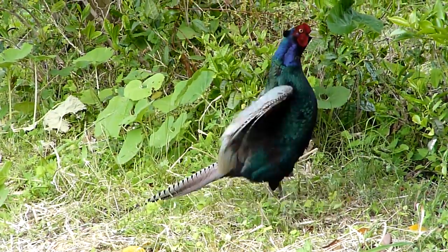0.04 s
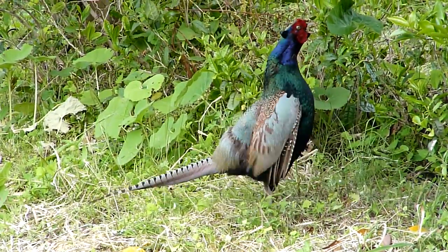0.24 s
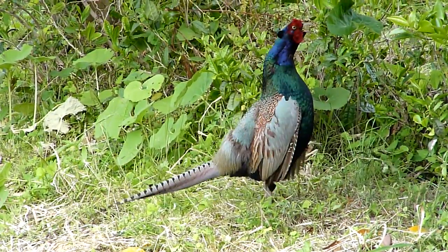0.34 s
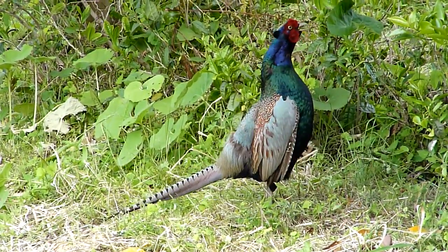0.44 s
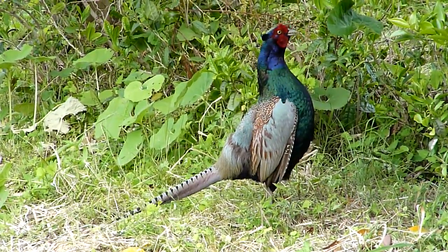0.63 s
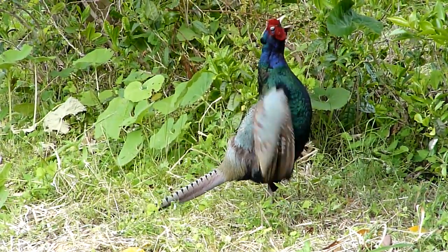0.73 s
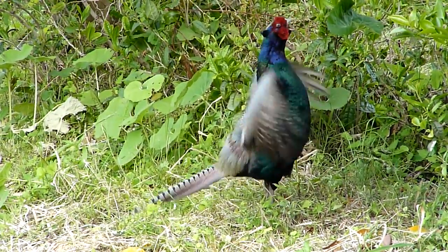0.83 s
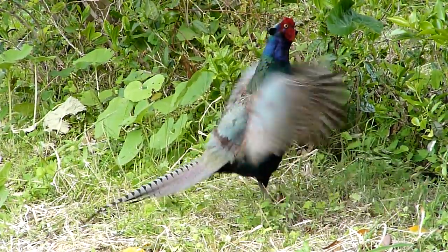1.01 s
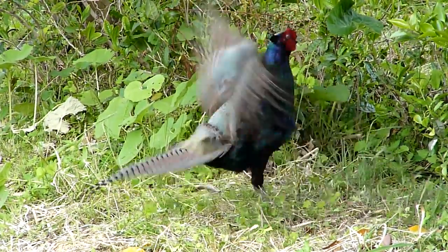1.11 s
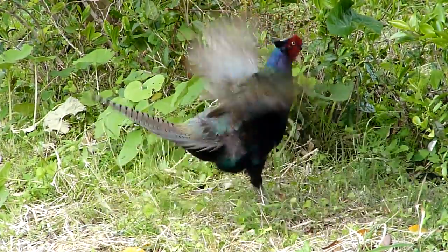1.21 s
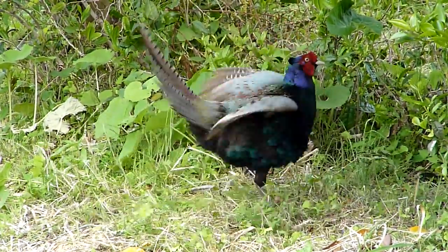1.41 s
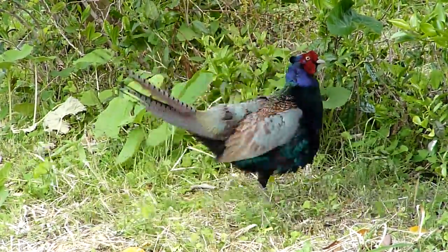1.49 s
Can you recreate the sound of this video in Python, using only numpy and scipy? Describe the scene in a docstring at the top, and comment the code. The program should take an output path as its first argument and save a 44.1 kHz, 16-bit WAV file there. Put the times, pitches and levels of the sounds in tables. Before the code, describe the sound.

A pheasant crows outdoors, straight ahead, over a faint steady hush. Just after a barely audible falling chirp, the first loud, harsh note runs from about 0.2 to 0.55 seconds. The second, from 0.7 to 1.05 seconds, briefly breaks into a squeal and leaves a slight echo. From about 0.9 to 1.45 seconds comes a softer flurry of about seven quick wing beats, with low thumps and rustling feathers.

```python
"""A faint falling chirp, then a cock pheasant crows two notes and whirrs his wings, almost dead ahead
of the microphones with a leafy bank behind him. His syrinx has a low and a high voice: the low one
chops the high one into sidebands, harshly in most of the crow, cleanly in a squeal inside the second
note. Near leaves and far trees scatter the sound over a faint outdoor hush."""
import sys
import numpy as np
from scipy import signal
from scipy.fft import rfft, irfft, next_fast_len
from scipy.io import wavfile
from scipy.ndimage import map_coordinates

SR = 44100
rng = np.random.default_rng(int(sys.argv[2]) if len(sys.argv) > 2 else 0)


def log_audio(samples):
    """Write samples as a 16-bit WAV file to the path given in sys.argv[1]."""
    # one column per channel
    frames = np.atleast_2d(samples).T
    # limit to full scale, then quantise
    limited = np.clip(frames, -1, 1)
    pcm = np.round(limited * 32767).astype(np.int16)
    wavfile.write(sys.argv[1], SR, pcm)


N = 68355

# The harsh stretches of the crow. Each row: time in seconds, low pitch in Hz, levels of fundamental,
# octave and treble in dB before their trims, roughness from 0 (clean) to about 1.
FIRST_NOTE = [(.226,1109,-32.5,-38,-48,0.3), (.233,1143,-42.5,-47,-32.5,1.11),
              (.247,1084,-31.5,-30,-31.5,0.97), (.266,1104,-23.5,-32,-29.5,0),
              (.295,1103,-20,-27,-28.5,0.08), (.309,1090,-30.5,-41.5,-27,1.1),
              (.355,1093,-26,-30,-28.5,0.37), (.404,1074,-36,-29,-30,0), (.424,1048,-25.5,-39.5,-29,0.4),
              (.474,1060,-30,-33,-33,0.5), (.503,1059,-29.5,-45,-40,0.33), (.548,1081,-46.5,-53.5,-67,0.2)]
SECOND_ATTACK = [(.729,1116,-29,-34.5,-32,0.56), (.743,1122,-21.5,-29.5,-28,0.19),
                 (.751,1102,-28.5,-28.5,-31,0.14)]
SECOND_NOTE = [(.856,1103,-39.5,-50,-26.5,1), (.872,1110,-33,-34.5,-26.5,0.88),
               (.892,1121,-21,-30,-31.5,0.11), (.922,1105,-21.5,-28.5,-32,0.15),
               (.934,1097,-29.5,-37,-29,0.48), (.95,1140,-19,-32.5,-33.5,0.1), (.967,1164,-21,-37,-31,0.1),
               (.977,1126,-30.5,-38,-33,0.16), (.992,1157,-22,-41,-39.5,0.074),
               (1.008,1162,-39,-48,-44.5,1), (1.017,1162,-30,-58,-46,0.18), (1.044,1101,-49.5,-36,-51,0.28)]
# The high voice in those stretches. Each row: time in seconds, pitch in Hz, then its own tone,
# upper sideband and lower sideband in relative dB.
HIGH_VOICE = [(.23, 5020, -6, -10.5, 1), (.27, 5030, 2, -7, -7), (.305, 5057, -2, -2, -11),
              (.352, 4994, -2.5, -8, -7), (.4, 4902, -13, -5.5, -11), (.44, 4950, -11, -15, -7),
              (.735, 5015, 3.5, -4, -2.5), (.895, 5066, -1, -6, -16), (.938, 5040, -4.5, -2, -8),
              (.962, 5137, -8, -20, -24), (.98, 4945, -13, -6, -3.5)]
# Colour of the rasp in each note and in the squeal. Each row: frequency in Hz, relative level in dB.
RASP_FIRST = [(300, -34), (600, -11.5), (900, 2), (1300, 4.5), (1750, -5.5), (1950, -7.5), (2250, 4.5),
              (2700, -11), (3550, -17), (3850, -6), (4350, 2), (5300, -3.5), (6200, -5.5), (7200, -9),
              (8300, -21), (11500, -21), (15500, -29)]
RASP_SECOND = [(300, -22), (600, -11), (900, 5), (1700, 1.5), (1950, 0), (2250, 4), (2700, -1.5),
               (3450, -9), (3850, 5), (6500, 1), (8300, -14.5), (11500, -7.5), (15500, -27)]
RASP_SQUEAL = [(400, -32), (1100, 4.5), (3200, -7), (4200, 4), (8300, -6), (11500, -1), (15500, -12)]
# Resonances of the throat at rest. Each row: centre in Hz, width in Hz, boost in dB.
THROAT_RESONANCES = [(1690, 41, 9.5), (3820, 140, 6.5), (4393, 170, 3), (4950, 180, 0), (6010, 270, 4),
                     (12240, 550, 1.5)]
# The clean squeal. Each row: time in seconds, low and high pitch in Hz, levels of fundamental,
# overtones and high voice in dB, the high voice's overtones in dB relative to it.
SQUEAL = [(.75,884,4951,-39,-58,-26.5,-4), (.762,863,4890,-28,-43,-28,0),
          (.79,858.6,4872,-32.5,-53,-25.5,-1), (.808,833,4830,-33,-42,-30,-1.5),
          (.822,828,4947,-31,-43,-25.5,-5), (.832,805,4870,-43,-38,-34,1),
          (.853,812,4816,-32.5,-44,-35.5,-8)]
# The squeal's low overtones. Each row: multiple of the low pitch, relative level in dB.
LOW_OVERTONES = [(2, -3), (3, 2.5), (4, -6.5), (5, 6), (9, -7)]
# The squeal's sidebands, round the high voice and round its overtones.
# Each row: multiple of the high pitch, multiple of the low pitch added to it, relative level in dB.
SQUEAL_BANDS = [(1, -1, 0), (1, 0, 0), (1, 1, -5.5), (1, 2, -14), (1, 3, -30)]
SQUEAL_OVERTONE_BANDS = [(2, 0, -8.5), (2, 1, -9), (2, 2, -19), (2, 3, -21), (3, -2, -27), (3, -1, -21),
                         (3, 1, -22)]

# Wing downstrokes. Each row: time in seconds, thump in dB, swish in dB.
DOWNSTROKES = [(0.937, -44, -47), (1.021, -42.5, -46), (1.1, -30, -39), (1.187, -36, -41.5),
               (1.2555, -35, -38.5), (1.3278, -34, -40.5), (1.3935, -37, -41)]
# Feathers flick as the wings turn. Each row: time in seconds, tick in dB, hollow knock in dB.
FLICKS = [(1.092, -50, -59), (1.175, -40, -41.5), (1.229, -35.5, -40), (1.246, -48, -44),
          (1.296, -40.5, -33.5), (1.317, -47.5, -40)]
# The plumage rustle swells and fades. Each row: time in seconds, level in dB.
RUSTLE_LEVEL = [(.9, -71), (1.02, -49), (1.41, -47.5), (1.46, -64.5), (1.55, -77)]
# Colours of the feather noises. Each row: frequency in Hz, relative level in dB.
SWISH_SPECTRUM = [(40, -26), (130, 4), (230, -7), (480, -4), (1600, -7), (2600, -19.5), (7000, -26),
                  (15000, -30)]
FLICK_SPECTRUM = [(60, -6), (800, -7.5), (1600, -4), (2200, -14), (3300, -6.5), (5000, -18), (15000, -23)]
RUSTLE_SPECTRUM = [(40, 0), (135, 4), (300, -1), (1200, -7.5), (2400, -19.5), (3500, -14), (6000, -23),
                   (15000, -37.5)]

# What the near leaves and the far trees send back. Each row: frequency in Hz, gain in dB.
LEAF_SCATTER = [(300, -33), (1100, -16.5), (2200, -12), (4500, -1.5)]
TREE_SCATTER = [(200, -45), (1100, -19), (2200, -14.5), (5000, -11)]
# The faint chirp. Each row: time in seconds, pitch in Hz, level in dB.
CHIRP = [(.174, 4050, -63), (.19, 3500, -56), (.207, 2920, -60)]
# Colour of the outdoor air. Each row: frequency in Hz, relative level in dB.
HUSH_SPECTRUM = [(15, -54), (35, -7), (110, -8.5), (700, -8), (1400, -8.5), (2560, -23), (3600, -14),
                 (4750, -21.5), (15500, -26.5)]
# How alike that air is at the two microphones. Each row: frequency in Hz, left-right correlation.
HUSH_LIKENESS = [(1000, 0.83), (4000, 0.08)]
# Dips in the recorder's response. Each row: centre in Hz, width in Hz, gain at the centre.
RECORDER_DIPS = [(2600, 217, .03), (4614, 223, 0.2)]


def crow():
    """Two harsh notes; the second breaks into a clean squeal just after its attack."""
    first = harsh_voices(FIRST_NOTE, RASP_FIRST)
    attack = harsh_voices(SECOND_ATTACK, RASP_SECOND)
    return first + attack + squeal() + harsh_voices(SECOND_NOTE, RASP_SECOND, after_squeal=True)


def harsh_voices(rows, rasp_spectrum, after_squeal=False, flutter_db=6, trim_db=-1.5, octave_trim_db=-1.3):
    """Both voices shake with the roughness, and each low cycle lets out a puff of rasp."""
    gate, low_hz, tone_db, octave_db, treble_db, rough = curves(rows)
    _, high_hz, own_db, upper_db, lower_db = curves(HIGH_VOICE)
    high_hz = high_hz + 22 * wobble(90)
    low = phase(low_hz) + 0.52 * rough * wobble(350)
    high = phase(high_hz) + 0.78 * rough * wobble(400)
    tone = amp(tone_db + trim_db + flutter_db * rough * wobble(220)) * np.cos(low)
    octave_gain = amp(octave_db + octave_trim_db + flutter_db * rough * wobble(260))
    octave = octave_gain * np.cos(2 * low + 0.16 * wobble(240))
    rasp = throat(noise(rasp_spectrum, gate=1 + 0.74 * np.cos(low)), high_hz)
    whistle = sidebands([(1, -1, lower_db), (1, 0, own_db), (1, 1, upper_db)], high, low, flutter_db=2)
    whistle *= amp(-4 * rough)  # the high voice sinks into the rasp as it roughens
    edge = amp(trim_db) * (whistle + rasp) + after_squeal * wavering_tone()
    return gate * (np.sqrt(2) * (tone + octave) + amp(treble_db + 0.5 * wobble(300)) * edge)


def squeal():
    """The low voice drops and runs clean, cutting the high voice into a ladder of sidebands."""
    gate, low_hz, high_hz, tone_db, overtone_db, high_db, top_db = curves(SQUEAL)
    low = phase(low_hz) + 0.025 * wobble(400)
    high = phase(high_hz) + 0.15 * wobble(600)
    overtones = sum(amp(db) * np.cos(round(k) * low) for k, db in LOW_OVERTONES)
    low_voice = np.sqrt(2) * (amp(tone_db) * np.cos(low) + amp(overtone_db) * overtones)
    whistle = sidebands(SQUEAL_BANDS, high, low)
    whistle += amp(top_db) * sidebands(SQUEAL_OVERTONE_BANDS, high, low)
    whistle *= amp(1.4 * wobble(450))
    rasp = amp(-12) * noise(RASP_SQUEAL, gate=1 + np.cos(low))
    return gate * (low_voice + amp(high_db) * (whistle + rasp))


def sidebands(bands, high, low, flutter_db=0.5):
    """The high voice chopped by the low one; each sideband flutters on its own."""
    return sum(amp(db + flutter_db * wobble(150))
               * np.cos(round(m) * high + round(k) * low + rng.uniform(0, 2 * np.pi))
               for m, k, db in bands)


def throat(rasp, high_hz, rest_pitch_hz=5035, waver=0.00792):
    """Resonances of the throat and beak, which bend with the high voice and waver."""
    def boost(hz):
        return amp(sum(db / (1 + (2 * (hz - centre) / width) ** 2)
                       for centre, width, db in THROAT_RESONANCES))
    speed = high_hz / rest_pitch_hz + waver * wobble(60)
    return unit(map_coordinates(filtered(rasp, boost), [np.cumsum(speed)], order=5, mode="mirror"))


def wavering_tone(hz=873):
    """A faint wavering tone and its octave under the second note, like the squeal's reverberation."""
    angle = phase(hz + 10 * wobble(120))
    return amp(-9 + 4.6 * wobble(68.7)) * (np.cos(angle) + amp(-10) * np.cos(2 * angle))


def wings(swish_lead_s=0.0064, knock_hz=461, whirr_hz=129.9):
    """Feather flicks, swishes and low pushes of air, over humming wings and rustling plumage."""
    thumps = sum(amp(db) * air_push(s) for s, db, _ in DOWNSTROKES)
    knocks = sum(amp(db) * ring(s, knock_hz, rise_s=0.001, fall_s=0.0082) for s, _, db in FLICKS)
    whirr = amp(-3) * np.cos(phase(whirr_hz + 6 * wobble(15.1)))
    swishes = sum(amp(db) * swell(s - swish_lead_s, rise_s=0.014, fall_s=0.01)
                  for s, _, db in DOWNSTROKES)
    swishes *= noise(SWISH_SPECTRUM, gate=amp(1.5 * wobble(500)))
    ticks = sum(amp(db) * swell(s, rise_s=0.001, fall_s=0.0035) for s, db, _ in FLICKS)
    ticks *= noise(FLICK_SPECTRUM)
    gate, rustle_db = curves(RUSTLE_LEVEL)
    plumage = gate * amp(rustle_db) * (noise(RUSTLE_SPECTRUM) + whirr)
    return thumps + knocks + swishes + ticks + plumage


def air_push(peak_s, hz=102.2, half_width_s=0.0053):
    """One downstroke shoves a low pulse of air at the microphones."""
    t = clock() - peak_s
    return np.exp(-(t / half_width_s) ** 2) * np.cos(2 * np.pi * hz * t)


def foliage(bird, spectrum, t60_s, build_s):
    """Diffuse reflections off leaves, different at each microphone."""
    t = clock()
    tail = rng.standard_normal((2, N)) * amp(-60 * t / t60_s) * (1 - np.exp(-(t / build_s) ** 2))
    tail /= np.linalg.norm(tail, axis=1, keepdims=True)
    reflected = filtered(bird, lambda hz: amp(along(spectrum, hz)))
    return signal.fftconvolve(reflected[None], tail, axes=1)[:, :N]


def tree_echo(bird, delay_s=0.375, top_hz=2007):
    """One dull echo comes back from the far trees."""
    late_and_dull = lambda hz: np.exp(-2j * np.pi * hz * delay_s) / (1 + (hz / top_hz) ** 4)
    return amp(-33) * filtered(bird, late_and_dull)


def chirp():
    """A short, faint falling note just before the crow."""
    gate, hz, db = curves(CHIRP)
    return gate * amp(db) * np.cos(phase(hz + 300 * wobble(700)))


def hush():
    """Steady outdoor air, wider in the treble."""
    spread = lambda hz: np.arccos(np.clip(along(HUSH_LIKENESS, hz), -1, 1)) / 2
    mid = filtered(noise(HUSH_SPECTRUM), lambda hz: np.cos(spread(hz)))
    side = filtered(noise(HUSH_SPECTRUM), lambda hz: np.sin(spread(hz)))
    return amp(-58) * np.array([mid + side, mid - side])


def amp(db):
    """Decibels to gain."""
    return 10 ** (np.asarray(db) / 20)


def unit(x):
    """Scale to rms 1."""
    return x / np.sqrt(np.mean(x ** 2) + 1e-20)


def clock():
    """Time of each sample in seconds."""
    return np.arange(N) / SR


def phase(hz):
    """Running phase of a pitch curve."""
    return 2 * np.pi * np.cumsum(hz) / SR


def along(points, hz):
    """Interpolate (Hz, value) points on a log frequency axis."""
    knots_hz, values = np.transpose(points)
    return np.interp(np.log(hz + 1), np.log(knots_hz + 1), values)


def curves(rows, fade_s=0.0071):
    """A soft gate over the rows' time span, then a curve for each further column."""
    times, *columns = np.transpose(rows)
    t = clock()
    outside = np.maximum(np.maximum(times[0] - t, t - times[-1]), 0)
    return [np.exp(-2 * (outside / fade_s) ** 2)] + [np.interp(t, times, c) for c in columns]


def wobble(rate):
    """A smooth random curve, rate knots a second."""
    return map_coordinates(rng.standard_normal(N), [clock() * rate], mode="mirror")


def swell(peak_s, rise_s, fall_s):
    """An envelope that rises and falls exponentially."""
    t = clock() - peak_s
    return np.exp(-np.maximum(-t / rise_s, t / fall_s))


def ring(peak_s, hz, rise_s, fall_s):
    """A damped swing."""
    return swell(peak_s, rise_s, fall_s) * np.cos(2 * np.pi * hz * (clock() - peak_s))


def filtered(x, response):
    """Pass x through a frequency response."""
    size = next_fast_len(N + SR // 2)
    return irfft(rfft(x, size) * response(np.fft.rfftfreq(size, 1 / SR)), size)[..., :N]


def noise(spectrum, gate=1):
    """Coloured noise of rms 1, chopped by gate before the colour."""
    return unit(filtered(gate * rng.standard_normal(N), lambda hz: amp(along(spectrum, hz))))


def scene():
    """The pheasant a touch right of centre, near leaves, far trees, a chirp and the hush."""
    bird = crow() + wings()
    direct = bird * amp([[-0.3], [0.3]])
    leaves = foliage(bird, LEAF_SCATTER, t60_s=0.045, build_s=0.00045)
    trees = foliage(bird, TREE_SCATTER, t60_s=0.5, build_s=0.027)
    return direct + leaves + trees + tree_echo(bird) + chirp() + hush()


def record(dry):
    """The recorder: a bass roll-off, two narrow dips and a band limit."""
    def response(hz, low_cut_hz=35, top_hz=15800):
        gain = hz ** 2 / (hz ** 2 + low_cut_hz ** 2) * (hz < top_hz)
        for centre, width, floor in RECORDER_DIPS:
            detuning, damping = centre ** 2 - hz ** 2, 2j * hz * width
            gain = gain * (detuning + floor * damping) / (detuning + damping)
        return gain
    return filtered(dry, response)


dry = scene()
out = record(dry)
log_audio(out)
```